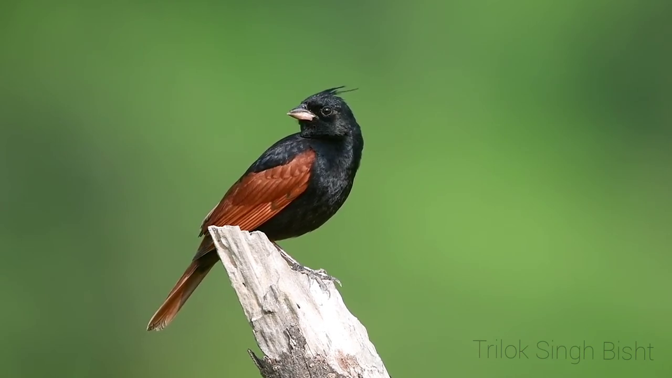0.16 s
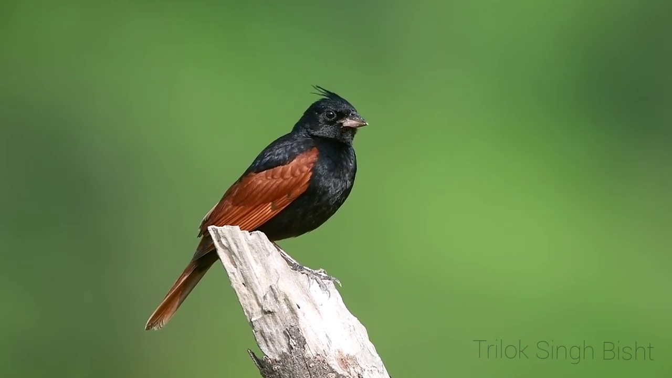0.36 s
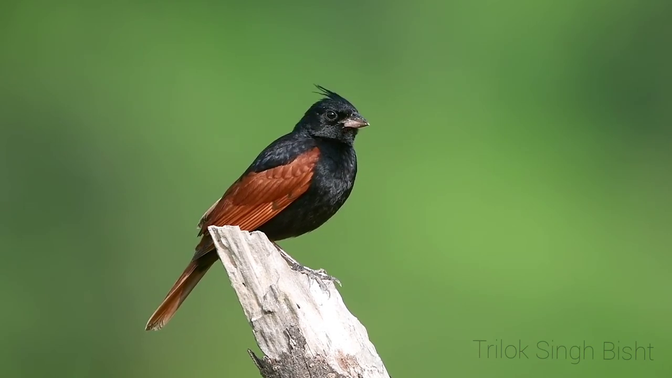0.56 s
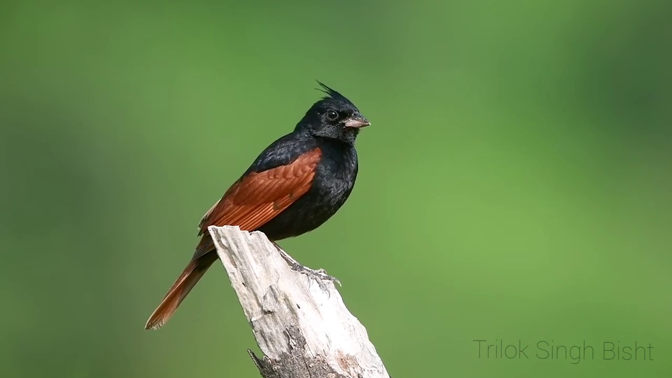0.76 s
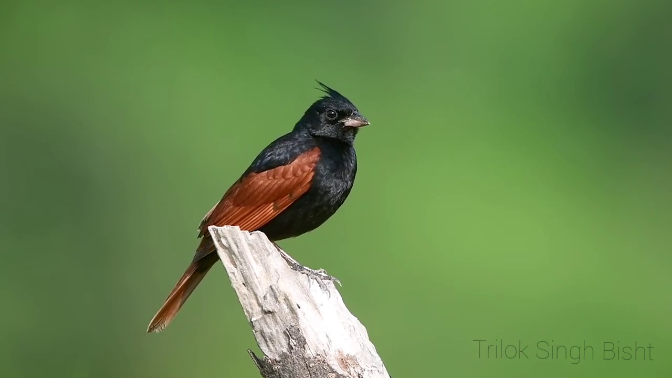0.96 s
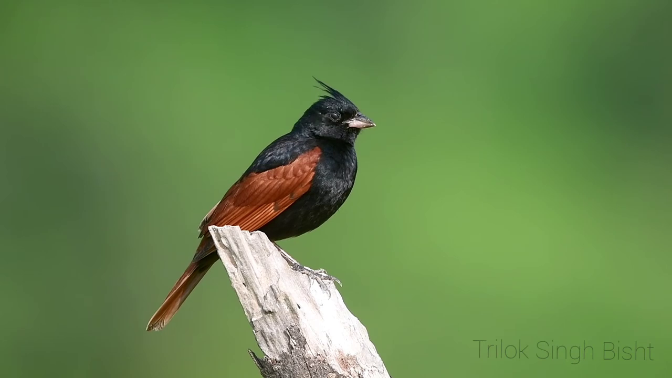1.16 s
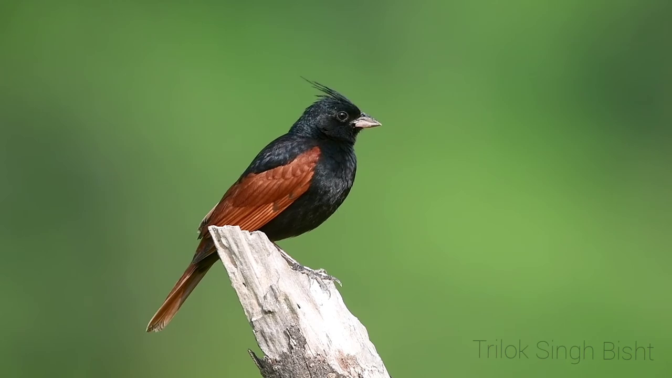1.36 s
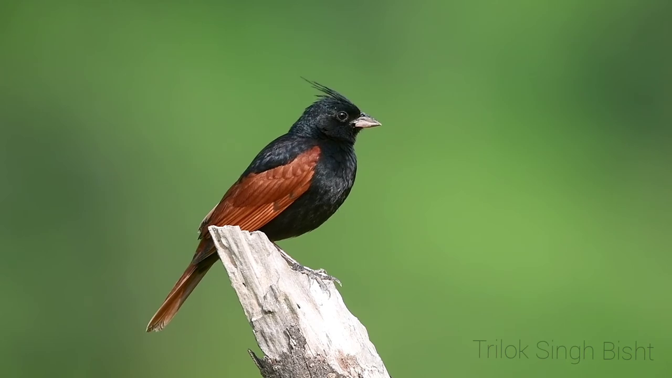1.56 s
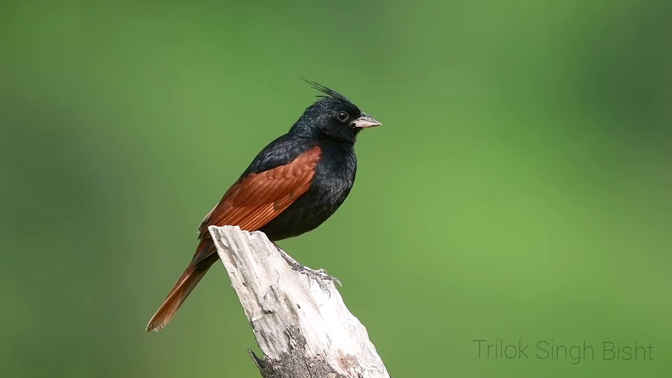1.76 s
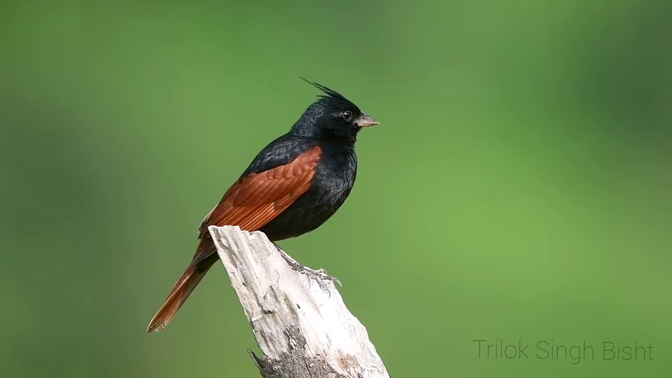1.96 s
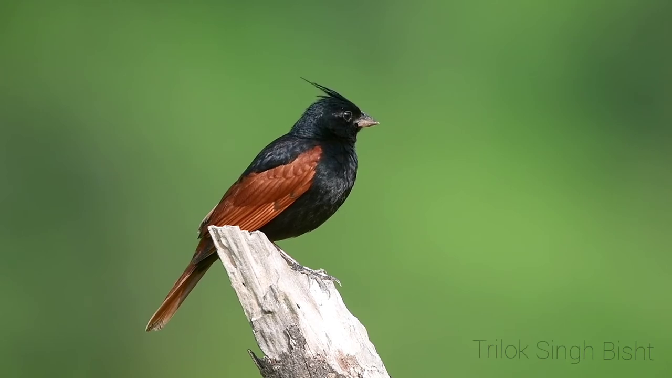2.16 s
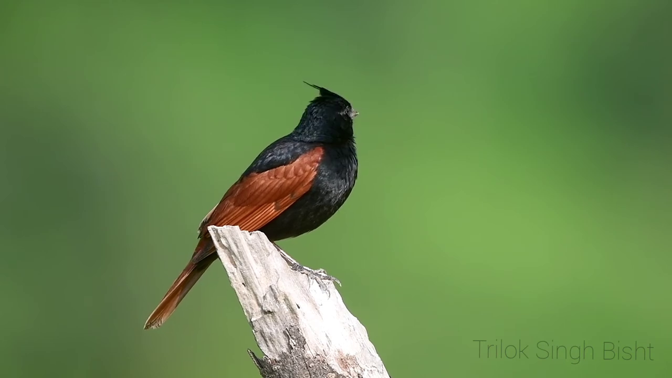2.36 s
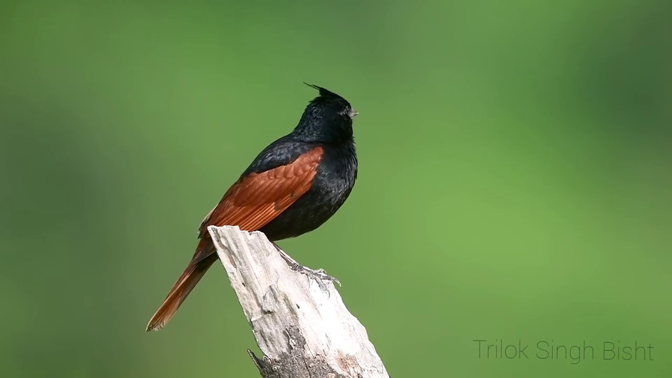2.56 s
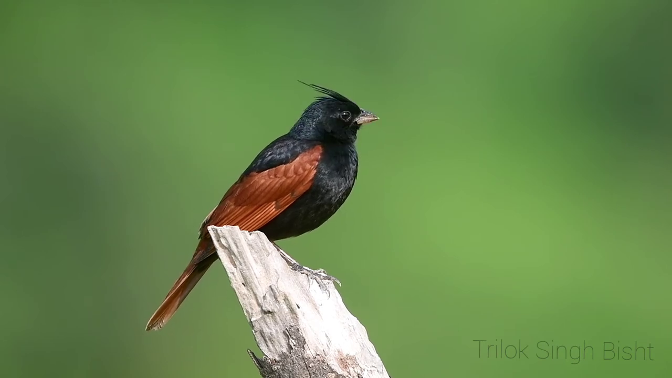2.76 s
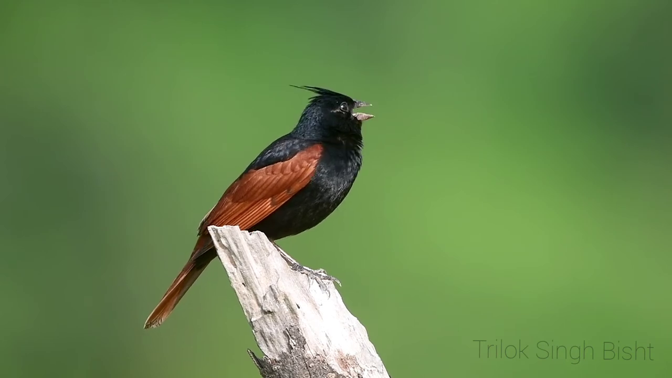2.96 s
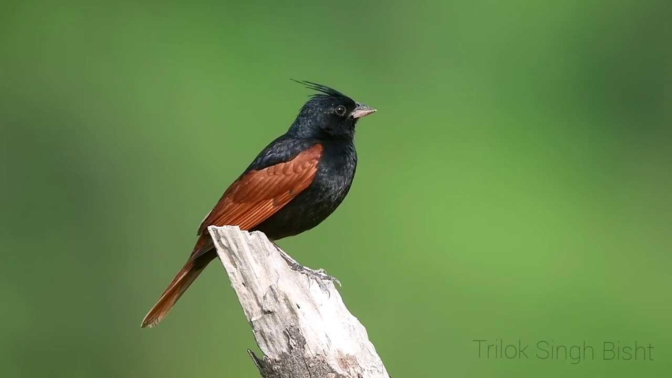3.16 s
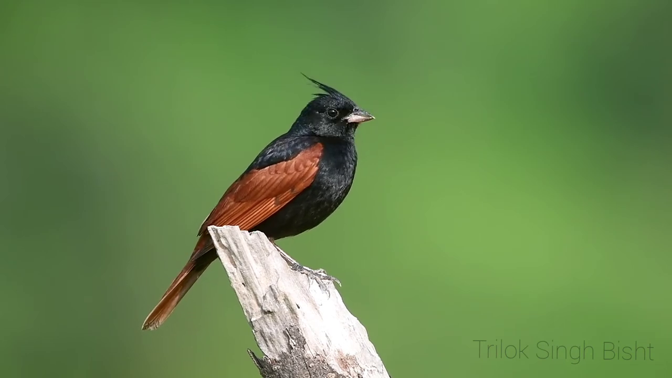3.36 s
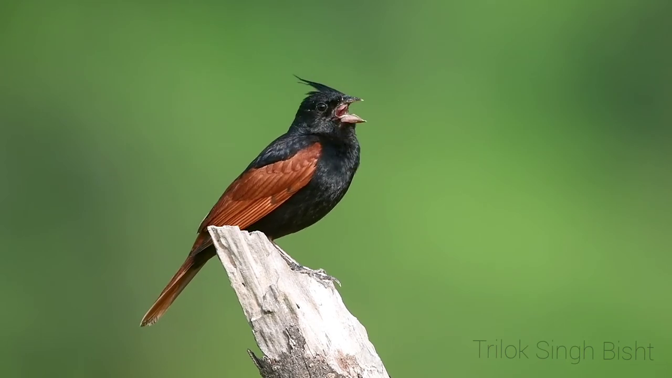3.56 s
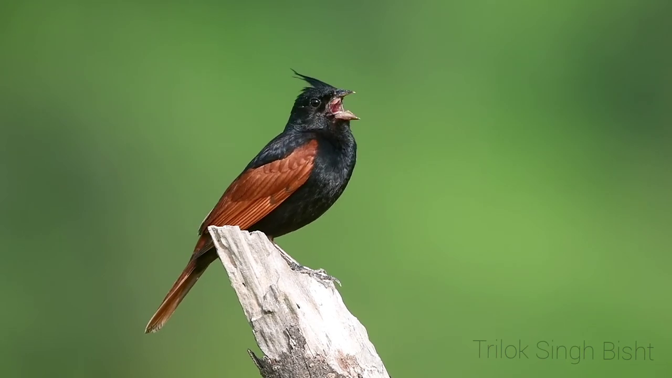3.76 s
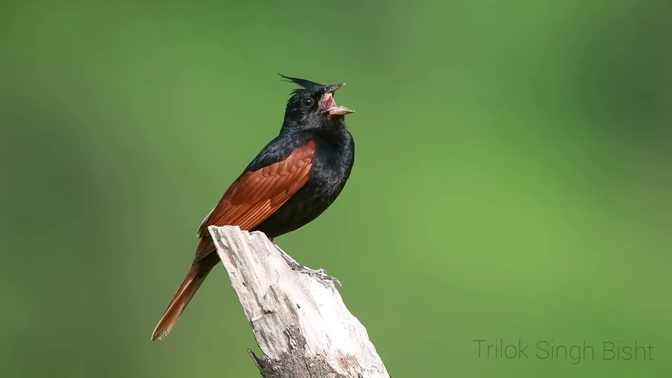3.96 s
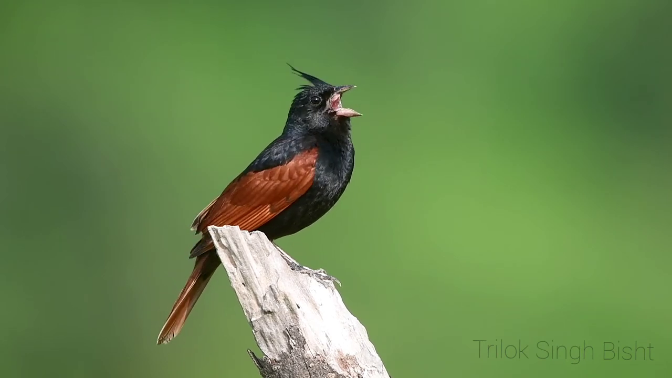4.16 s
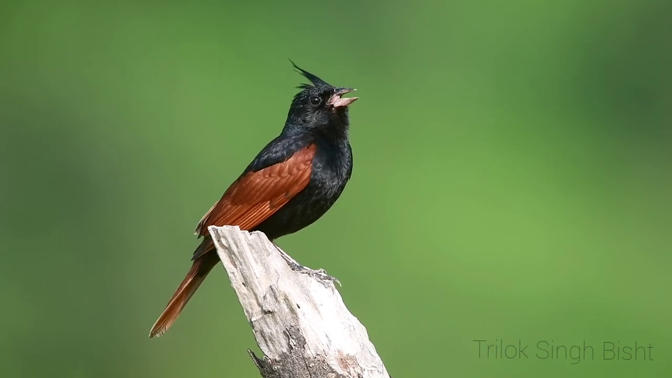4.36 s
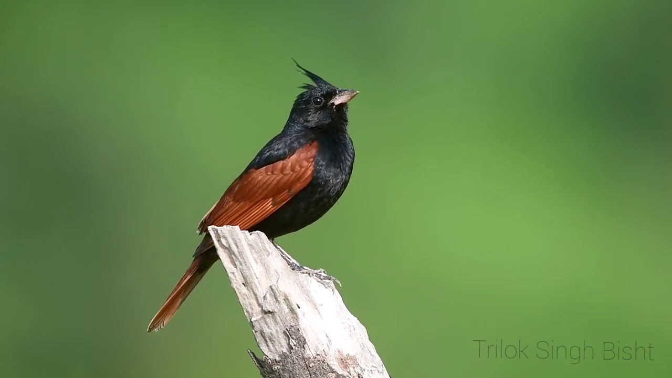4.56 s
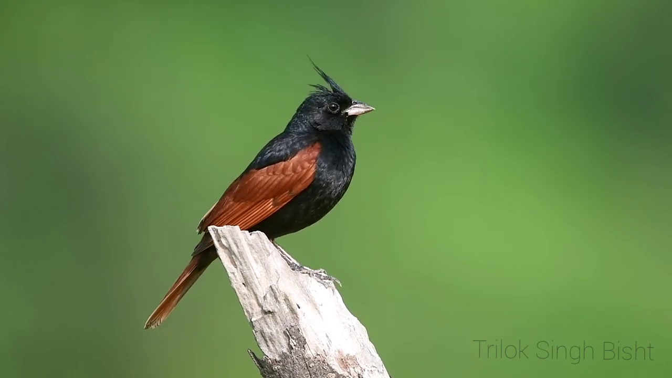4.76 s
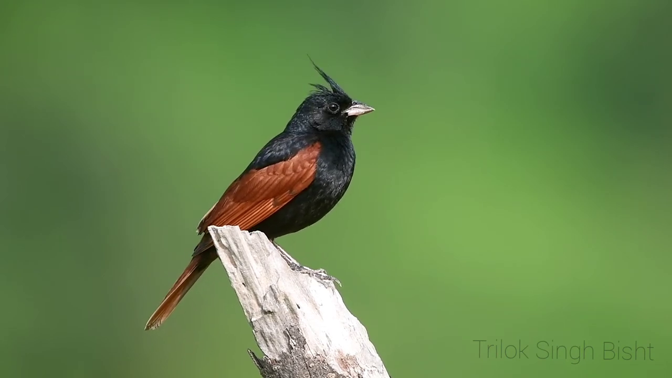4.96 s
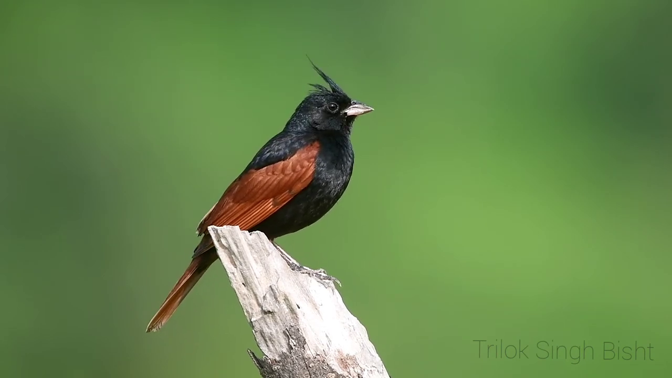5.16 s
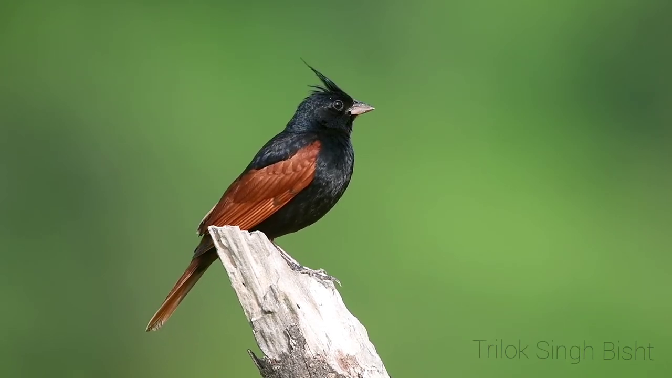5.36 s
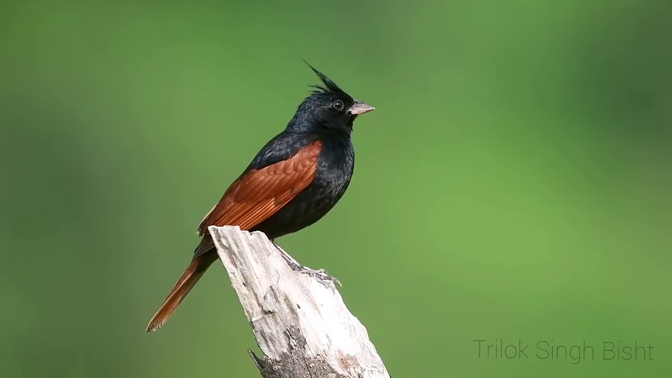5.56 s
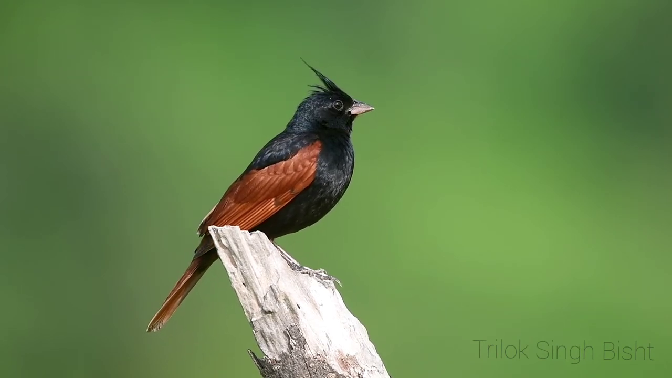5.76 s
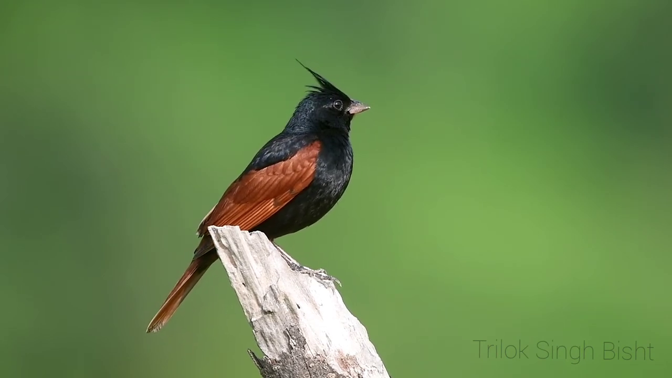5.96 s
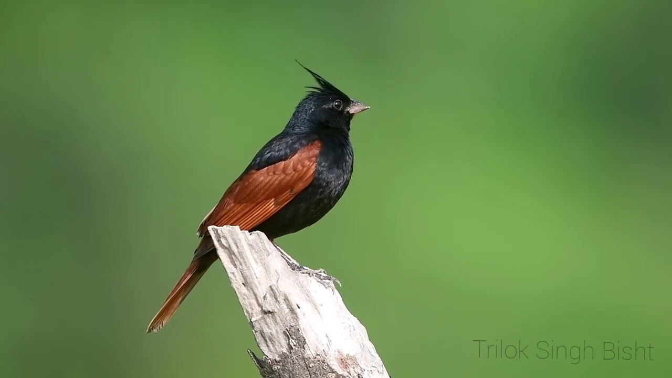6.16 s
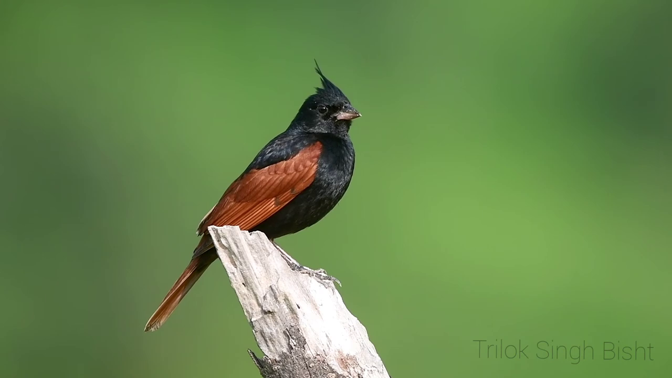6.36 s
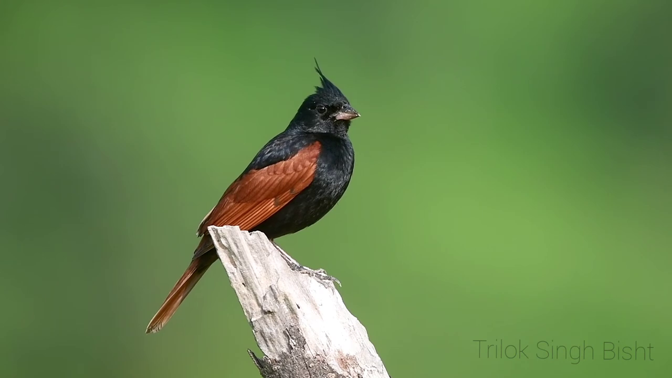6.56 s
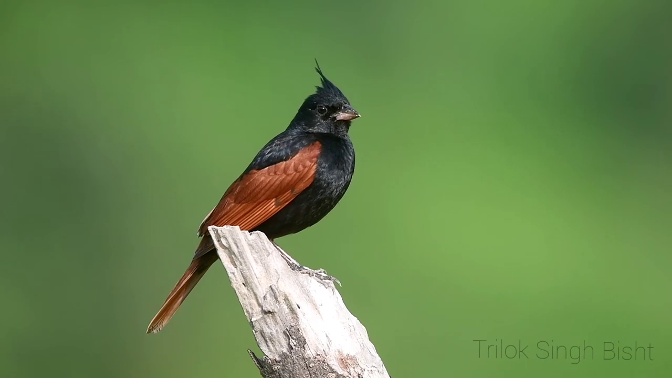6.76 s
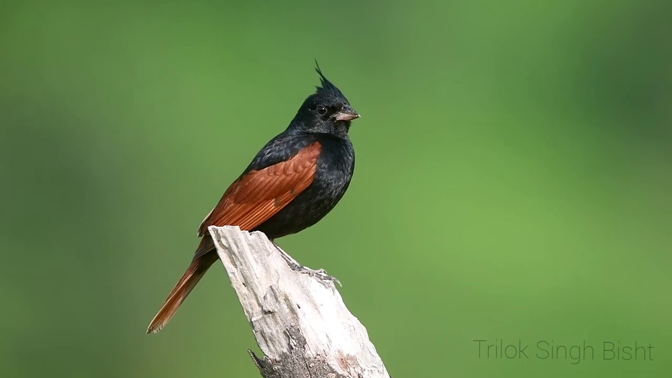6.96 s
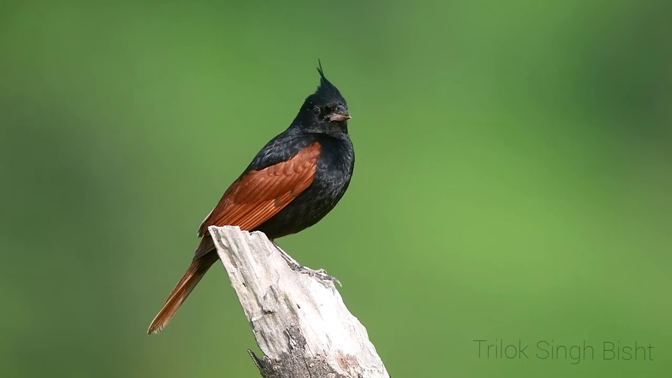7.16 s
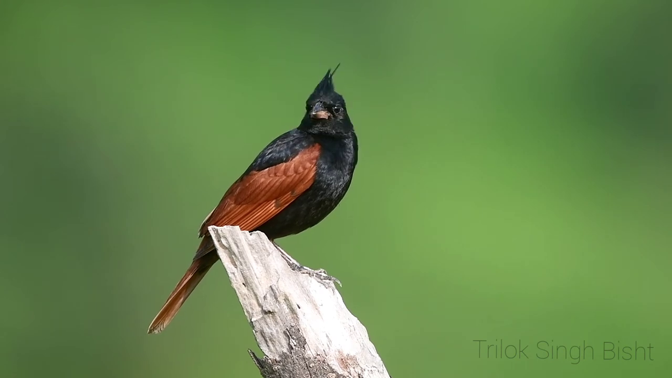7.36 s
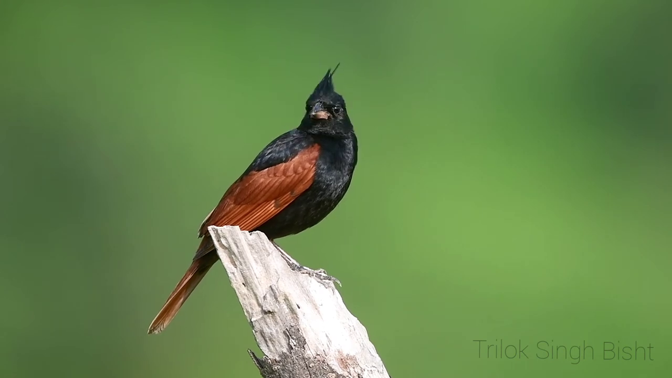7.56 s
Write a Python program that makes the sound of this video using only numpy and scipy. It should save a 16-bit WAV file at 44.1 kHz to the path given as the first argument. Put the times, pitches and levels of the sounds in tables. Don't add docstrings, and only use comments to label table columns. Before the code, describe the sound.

A small crested bird close by sings four buzzy, whistled syllables and a long falling glide, over faint distant chips, wails and insect shimmer.

```python
import sys
import numpy as np
from scipy import signal
from scipy.fft import rfft, irfft, next_fast_len
from scipy.io import wavfile
from scipy.ndimage import uniform_filter1d, map_coordinates

SR = 44100
rng = np.random.default_rng(int(sys.argv[2]) if len(sys.argv) > 2 else 0)


def makeup_ratio(level_db):
    decades = np.asarray(level_db, float) / 20
    return 10 ** decades


def output_pcm(signal):
    pcm = np.clip(np.atleast_2d(signal).T, -1, 1) * 32767
    wavfile.write(sys.argv[1], SR, np.round(pcm).astype(np.int16))


N = 336042

BUZZ_DEPTH_HZ = 370
BUZZ_FADE_S = .003


def unit(x):
    return x / np.sqrt(np.mean(x ** 2) + 1e-20)


def along(points, hz, order=1):
    table = np.transpose(points)
    return np.interp(np.log(hz + 1), np.log(table[0] + 1), table[order])


def curves(rows):
    s, *cols = np.transpose(rows)
    return [np.interp(np.arange(N) / SR, s, c) for c in cols]


def note(rows):
    s, *cols = np.transpose(rows)
    t = np.arange(max(s[0], 0), s[-1], 1 / SR)
    return round(t[0] * SR), t, [np.interp(t, s, c) for c in cols]


def add(mix, start, x, pan_db=0, lag=0):
    for side, (late, sign) in enumerate(((max(lag, 0), 1), (max(-lag, 0), -1))):
        part = mix[side, start + late:][:len(x)]
        part += makeup_ratio(sign * pan_db / 2) * x[:len(part)]


def phase(hz):
    return 2 * np.pi * np.cumsum(hz) / SR


def wobble(rate, size=N):
    knots = rng.standard_normal(int(N * rate / SR) + 4)
    return map_coordinates(knots, [np.arange(size) * rate / SR], order=2)


def filtered(x, response):
    m = next_fast_len(N + 8192)
    return irfft(rfft(x, m) * response(np.fft.rfftfreq(m, 1 / SR)), m)[..., :N]


def syllable(s, db, whistle_s, buzz_s, swell_db):
    start, fall_s = s - whistle_s, .061 + .0004 * db
    end_db = -22.5 + 400 * buzz_s
    buzz = []
    for before, level in ((buzz_s, -24.5), (buzz_s / 2, end_db - 5), (BUZZ_FADE_S, end_db)):
        buzz.append((start - before, 6108 + 12000 * before, level, BUZZ_DEPTH_HZ))
    whistle_hz, sink_hz_per_s = 6054, 36000
    turn_s = .021 - .56 * whistle_s
    low_hz = whistle_hz - sink_hz_per_s * (whistle_s - turn_s)
    whistle = [(start, whistle_hz, -0.5, 0), (s - turn_s, low_hz, swell_db, 0)]
    flick = [(s - .4 * turn_s, 5780, -5 + swell_db / 2, 0), (s, 6250, -28, 0)]
    # share of its length, pitch in Hz, level in dB.
    fall_shape = [(.04, 6650, -16.5), (.125, 5790, -0.5), (.29, 5078, 0), (.82, 3838, -1),
                  (.9, 3500, -10.5), (1, 3164, -19.5)]
    fall = [(s + share * fall_s, hz, level, 0) for share, hz, level in fall_shape]
    return np.add(buzz + whistle + flick + fall, [0, 0, db, 0])


def syrinx(rows, buzz_hz=168, dip=.76):
    # time in seconds, length in seconds, depth 0-1.
    catches = [(2.955, .005, 0.4), (2.970, .003, 1), (2.977, .004, .85), (2.997, .007, 0.4),
               (3.556, .004, 0.95), (3.568, .004, 0.5), (3.597, .005, 0.8), (3.779, .004, 0.2),
               (3.813, .003, 0.5), (3.988, .005, 0.17), (4.017, .004, 0.4), (4.17, .005, 0.85),
               (4.185, .01, 0)]
    # time in seconds, length in seconds, gain in dB.
    surges = [(2.959, 0.012, 4), (2.984, 0.0094, 9.5), (3.559, 0.016, 4.5), (3.584, 0.0053, 4),
              (3.79, .008, 3.5), (3.847, 0.017, 2), (4.257, 0.044, 0)]
    start, t, (hz, db, depth_hz) = note(rows)
    share = depth_hz / BUZZ_DEPTH_HZ
    stop = 0
    if depth_hz.any():
        stop = t[np.flatnonzero(depth_hz > 1)[-1]]
    else:
        hz = uniform_filter1d(hz, size=700, mode="nearest")
    swing = 2 * np.pi * buzz_hz * (t - stop + BUZZ_FADE_S) + 0.67 * wobble(120, len(t))
    shake = np.cos(swing)
    sung_hz = hz + depth_hz * shake
    turn = phase(sung_hz + 8 * wobble(250, len(t)))
    lean = np.clip(-0.44 + 17 * (stop - t), -.8, .8) * np.clip(share, 0, 1)
    level = makeup_ratio(db + 0.52 * wobble(330, len(t)))
    level = level * (1 - dip * np.clip(share, 0, 1) * ((1 + shake) / 2) ** 2)
    level = level * (1 + lean * np.sin(swing))
    level = level * np.clip(np.minimum(t - t[0], t[-1] - t) / .002, 0, 1)
    for s, length, depth in catches:
        level = level * (1 - np.clip(depth, 0, 1) * np.exp(-(2 * (t - s) / length) ** 2))
    for s, length, gain_db in surges:
        level = level * makeup_ratio(gain_db * np.exp(-(2 * (t - s) / length) ** 2))
    return start, sung_hz, turn, level, share


def bunting():
    # break in seconds, level in dB, whistle and buzz lengths in seconds, swell in dB.
    syllables = [
        (2.979, -17, 0.022, 0.037, 1.5),
        (3.576, -4.5, 0.021, 0.036, -2.5),
        (3.797, 0, .027, 0.048, -1.5),
        (4.0046, 0, 0.03, 0.059, -2.5),
    ]
    # time in seconds, pitch in Hz, level in dB.
    glide = [(4.12, 5670, -47.5), (4.14, 5390, -18.5), (4.164, 5203, -10), (4.21, 4840, -12.5),
             (4.25, 4526, -12), (4.29, 4240, -16), (4.349, 3937, -21.5), (4.355, 3680, -50)]
    # multiple of the pitch, level in dB.
    overtones = [(2, -45), (3, -46)]
    # Hz, left in dB, right in dB, left lead in radians.
    path = [(3500, -14, -12, 0.49), (4050, -12, -9, .45), (4500, -9.5, -9, 0.39), (4650, -7.5, -13, -0.43),
            (5260, -10, -5.5, .05), (5770, -12, -6, -0.37), (6300, -9, -3, 1.8), (6600, -4.5, -10.5, 0.35)]
    # Hz, level in dB.
    beak = [(7500, -10), (8500, -5), (9500, -8), (11000, -2.5), (13500, -4.5), (15500, -10)]
    # delay in seconds, left then right.
    echo_s = [
        [9 / 4640],
        [14.5 / 4640],
    ]
    echo_db = [[-10], [-4.5]]

    def near_surface(hz):
        band = np.exp(-((hz - 4800) / 400) ** 2 - 2j * np.pi * hz * np.array(echo_s))
        return 1 + makeup_ratio(echo_db) * band

    closing = np.pad(np.add(glide, [0, 0, 12]), ((0, 0), (0, 1)))
    tone, over = np.zeros((2, 2, N))
    for rows in [syllable(*row) for row in syllables] + [closing]:
        start, sung_hz, turn, level, share = syrinx(rows)
        size = len(turn)
        ports = [along(path, sung_hz, order=k) for k in (1, 2, 3)]
        left_db, right_db, lead = uniform_filter1d(ports, size=45, mode="nearest")
        pair = np.sin([turn + lead / 2, turn - lead / 2])
        tone[:, start:start + size] += level * makeup_ratio([left_db, right_db]) * pair
        for k, k_db in overtones:
            edge_db = k_db + 6 * share + 2.6 * wobble(200, size)
            add(over, start, makeup_ratio(edge_db - 10.5) * level * np.sin(k * turn), pan_db=9.0)
    tone = filtered(tone, near_surface)
    over = filtered(over, lambda hz: makeup_ratio(along(beak, hz)))
    scatter = makeup_ratio(2.0) * twigs(over, t60=.05) + makeup_ratio(-14.0) * twigs(tone, t60=0.063)
    return tone + over + scatter + makeup_ratio(-31.5) * hillside(tone)


def whistlers():
    # seconds from the top, pitch in Hz, level in dB.
    swoop = [(-.07, 1447, -20), (-.025, 1676, -8), (-.01, 2250, -1.5), (0, 2480, -10.5), (.11, 2206, 0.5),
             (.21, 1983, -6), (.25, 1914, -19)]
    # time in seconds, level in dB, pitch ratio.
    swoop_calls = [
        (1.96, -55, 0.99),
        (2.452, -55.5, 1.02),
    ]
    # seconds from the start, pitch in Hz, level in dB.
    pipe = [(0, 1747, -13), (.022, 2015, -2.5), (.062, 2013, -0.5), (.081, 2480, -10), (.104, 2330, -12),
            (.111, 2310, -21)]
    # time in seconds, level in dB, pitch ratio.
    pipe_calls = [
        (5.688, -45.5, 0.98),
        (5.853, -42, 0.97),
        (6.032, -42, 0.99),
    ]
    # time in seconds, pitch in Hz, level in dB.
    flourish = [(7.255, 1987, -57), (7.270, 2005, -42.5), (7.283, 2060, -58), (7.292, 1616, -62),
                (7.322, 1780, -45), (7.335, 2250, -55), (7.365, 2110, -59), (7.390, 2013, -49),
                (7.410, 1914, -64)]
    # time in seconds, pitch in Hz, level in dB.
    churr = [
        [(7.062, 1700, -63), (7.078, 1745, -52), (7.105, 1740, -49), (7.125, 1606, -54), (7.145, 1730, -53.5),
         (7.19, 1710, -50), (7.21, 1680, -66)],
        [(7.065, 2020, -58), (7.098, 1970, -51), (7.118, 1846, -54), (7.14, 2020, -55), (7.178, 2050, -49.5),
         (7.205, 2030, -55)],
        [(7.128, 2200, -52), (7.142, 2280, -54), (7.18, 2220, -55), (7.205, 2200, -63)],
    ]
    # time and length in seconds, first and last Hz, peak in dB.
    slurs = [(0, 0.037, 1366, 1275, -52.5), (.03, 0.058, 1214, 1150, -59.5), (0.01, 0.03, 3700, 2900, -61),
             (0.424, .025, 2340, 2170, -70), (.48, .1, 1490, 1500, -66.5), (1.417, .04, 3850, 4200, -58),
             (2.602, .075, 2000, 1770, -67), (5.11, .05, 2200, 2287, -57.5), (5.296, .04, 1840, 1848, -68),
             (5.12, .11, 3940, 4234, -58), (7.03, .03, 3780, 4050, -67.5),
             (0.019, 0.043, 2160, 2050, -57.5), (0.098, 0.052, 2100, 1840, -62.5),
             (0.343, 0.054, 3920, 3000, -63), (0.582, 0.036, 5000, 4330, -53),
             (1.279, 0.11, 4660, 4240, -55), (3.352, 0.073, 1270, 1090, -62), (3.43, 0.14, 834, 841, -62.5),
             (3.528, 0.12, 850, 1090, -67), (5.022, 0.11, 4050, 3930, -64),
             (5.026, 0.094, 5200, 4500, -63.5), (5.238, .04, 6550, 6530, -53),
             (6.017, 0.025, 6560, 6600, -62), (6.905, 0.045, 4480, 4240, -67),
             (7.277, 0.052, 2900, 3500, -58.5), (7.282, 0.022, 2350, 2330, -55),
             (7.504, 0.064, 3730, 3540, -63.5)]
    # left-right in dB, samples left lags, gain in dB.
    seats = [(-11, 10, 3), (-3, 1, 0), (7, -10, 7), (7, -10, 7), (-3, 2, 0)]

    def calls(shape, events):
        return [np.multiply(shape, [1, ratio, 1]) + [s, 0, db] for s, db, ratio in events]

    tweets, peak = [], 0.37
    for s, length, first_hz, last_hz, db in slurs:
        top = (s + peak * length, first_hz + peak * (last_hz - first_hz), db)
        tweets.append([(s, first_hz, db - 3), top, (s + length, last_hz, db - 6)])
    birds = [(calls(swoop, swoop_calls), .4, 0), (calls(pipe, pipe_calls), .4, .2),
             ([flourish], .4, 0), (churr, .9, 0), (tweets, .9, 0)]
    mix = np.zeros((2, N))
    for (notes, far, burr), (pan_db, lag, gain_db) in zip(birds, seats):
        for rows in notes:
            start, t, (hz, db) = note(rows)
            smooth_hz = uniform_filter1d(hz, 200, mode="nearest")
            level = makeup_ratio(db + gain_db + far * 3.5 * wobble(90, len(t)))
            level = level * (1 + burr * np.sin(2 * np.pi * 290 * t))
            tone = np.sin(phase(smooth_hz * (1 + far * .012 * wobble(70, len(t)))))
            add(mix, start, level * tone, pan_db, lag)
    return mix


def chipper():
    # time in seconds, peak in dB.
    chips = [(0.149, -48.5), (0.2394, -53), (1.252, -43.5), (5.269, -51), (5.368, -45), (5.455, -57),
             (6.175, -53), (1.1416, -42.5), (1.236, -45), (1.3396, -42.5), (1.538, -45), (1.632, -44.5),
             (1.882, -44.5), (1.959, -45.5), (3.1536, -43.5), (3.241, -40.5), (3.328, -38), (3.4167, -43),
             (4.8314, -46.5), (4.928, -44), (5.211, -47), (5.3, -43), (5.349, -45.5), (5.437, -41.5),
             (5.5297, -43.5), (5.6104, -47), (5.695, -47.5), (6.2754, -49), (6.496, -45.5), (6.591, -46.5),
             (7.1174, -43), (7.21, -47), (7.454, -43), (7.553, -42)]
    second_s, second_db = .042, -14
    t, mix = np.arange(0, .036, 1 / SR), np.zeros((2, N))
    along_chip = t / t[-1]
    for s, db in list(chips) + [(s + second_s, db + second_db) for s, db in chips]:
        hz = 5760 * rng.normal(1, .006) * (1 - .15 * along_chip ** 1.9)
        hz = hz + 45 * wobble(300, len(t))
        level = makeup_ratio(db - 8.5 + 2.8 * wobble(150, len(t))) * np.sin(np.pi * along_chip ** 0.64)
        add(mix, round((s - .005) * SR), level * np.sin(phase(hz)), pan_db=-12.5)
    return makeup_ratio(-2.0) * (mix + makeup_ratio(-4) * twigs(mix, t60=0.11))


def wail(mix):
    # time in seconds, pitch in Hz, level in dB, brightness in dB per octave.
    wails = [
        [(1.95, 584.4, -79, 3), (2.0, 728, -68.5, 1.5), (2.09, 859, -67, 5), (2.17, 1008, -67, -1),
         (2.33, 1029, -77, 9), (2.365, 1010, -61.5, -15), (2.535, 1008, -63, -14), (2.58, 1008, -70, 3),
         (2.73, 995, -79.5, 5.5)],
        [(4.76, 503, -67, -5), (4.85, 575, -63, -13), (4.89, 650, -54.5, -2.5), (4.96, 833, -67, -1),
         (4.99, 868, -64, 0), (5.01, 976, -68, -6), (5.17, 1037, -66.5, 2.5), (5.51, 1015, -61.5, -8),
         (5.545, 990, -64, -1)],
    ]
    # time in seconds, undertone level in dB.
    splits = [
        (2.539, -4.5),
        (5.07, -6),
    ]
    # thirds of the pitch, level in dB.
    orders = [(3, 3), (4, 10), (5, 5), (6, 4.5), (7, 4), (9, -9), (12, -10)]
    # Hz, level in dB.
    wail_throat = [(600, -22), (850, -9), (1020, -1), (1300, 3), (1700, -3), (2080, 3), (2400, -1),
                   (3300, -6), (3700, -30)]
    for rows, (split_s, split_db) in zip(wails, splits):
        start, t, (hz, db, bright_db) = note(rows)
        under_db = np.interp(t - split_s, [-.03, .03], [-30, split_db])
        beads = .55 * np.sin(phase(40 + 7 * wobble(18.0, len(t))))
        under_db = under_db + 20 * np.log10(1 + beads)
        crack_hz = 3 + .004 * SR * np.abs(np.gradient(hz))
        turn = phase(hz + crack_hz * wobble(46.0, len(t))) / 3
        for k, k_db in orders:
            level_db = db + k_db + bright_db * np.log2(k / 3) + along(wail_throat, k * hz / 3)
            level_db = level_db + under_db * (k % 3 > 0) + 2.4 * wobble(50, len(t))
            add(mix, start, makeup_ratio(level_db) * np.sin(k * turn))


def croak(mix):
    # time in seconds, pitch in Hz, level in dB, rasp 0-1.
    croaks = [
        [(2.73, 760, -69, 0.75), (2.80, 648, -48.5, 0.7), (2.85, 583, -55, 0.6), (2.89, 535, -88, 1)],
        [(5.545, 726, -58, 0.9), (5.74, 695, -53, 1), (5.83, 649, -54, 0.75), (5.93, 630, -43.5, 0),
         (5.985, 583, -52, 0.36), (6.02, 600, -69, 0.9), (6.2, 574, -71, 0.98)],
    ]
    # rasp factor, upper band in dB.
    croak_throats = [
        (1.5, -9),
        (.8, 0),
    ]
    for rows, (hoarse, band_db) in zip(croaks, croak_throats):
        start, t, (hz, db, rasp) = note(rows)
        rough = np.clip(rasp, 0, 1)
        upper_db = np.minimum(-58 - db, 0)
        scatter_hz = hoarse * 22 * rough * wobble(261.2, len(t))
        turn = phase(hz + 8 * wobble(58.8, len(t)) + scatter_hz)
        beat = 1 + .75 * rough * np.sin(phase(42 + 10 * wobble(20, len(t))))
        beat = beat * makeup_ratio((.8 + 2 * rasp) * wobble(150, len(t)))
        bands = np.sin(2 * turn) + makeup_ratio(upper_db + band_db) * np.sin(3.12 * turn)
        add(mix, start, makeup_ratio(db) * beat * bands)


def fowl():
    mix = np.zeros((2, N))
    wail(mix)
    croak(mix)
    return np.array([np.roll(mix[0], 6), makeup_ratio(4.5) * mix[1]])


def rattler():
    # time and length in seconds, low and high Hz, level in dB.
    rattles = [
        (2.930, .064, 2220, 3120, -30.5),
        (2.990, .068, 2830, 2990, -43),
        (2.990, .045, 2150, 2400, -47),
    ]
    # left-right in dB, steady part under the pulses, pulses a second, swell in dB a second.
    rattle_seats = [
        (-11, .14, 225, -110),
        (-11, .4, 215, 40),
        (-11, .2, 215, -60),
    ]
    mix = np.zeros((2, N))
    for (s, length, low_hz, high_hz, db), (pan_db, steady, rate, swell_db) in zip(rattles, rattle_seats):
        t = np.arange(0, length, 1 / SR)
        shape = np.clip(np.minimum(t / .007, (length - t) / (.3 * length)), 0, 1) * makeup_ratio(swell_db * t)
        for hz, lag, gain in ((low_hz, 0, 1), (high_hz, 1.1, 0.77)):
            pulse = steady + np.sin(phase(rate + 10 * wobble(90, len(t))) / 2 + lag) ** 4
            pulse = pulse * makeup_ratio(1.9 * wobble(156, len(t)))
            band = np.sin(phase(hz + 75 * wobble(250, len(t))))
            add(mix, round(s * SR), makeup_ratio(db) * shape * gain * pulse * band, pan_db, lag=9)
    return mix


def mutterer():
    # time and length in seconds, centre in Hz, scatter in Hz, level in dB.
    mutters = [(.17, .08, 3250, 200, -61), (.74, .06, 3800, 110, -64), (.88, .04, 3100, 120, -64),
               (1.19, .06, 3550, 300, -61), (2.8, .04, 1830, 60, -63), (2.81, .06, 2350, 130, -62),
               (4.63, .17, 3050, 130, -60), (5.43, .13, 3350, 300, -59), (7.06, .15, 3350, 250, -61)]
    mix = np.zeros((2, N))
    for s, length, hz, scatter_hz, db in mutters:
        t = np.arange(0, length, 1 / SR)
        level = makeup_ratio(db + 1.7 * wobble(210, len(t))) * np.abs(np.sin(np.pi * t / length)) ** .5
        voice = np.sin(phase(hz + scatter_hz * wobble(440, len(t))))
        add(mix, round(s * SR), level * voice, pan_db=-4.5)
    return mix


def scolder():
    # time in seconds, length in seconds, level in dB.
    scolds = [(4.615, 0.21, -50.5), (4.821, 0.15, -59), (5.099, 0.16, -51), (5.253, 0.11, -53.5),
              (5.423, 0.16, -57.5), (5.733, 0.15, -51), (5.942, 0.093, -49.5), (6.013, 0.14, -52.5),
              (7.044, 0.33, -61.5)]
    # centre in Hz, width in Hz, level in dB.
    scold_throat = [(3000, 220, -10), (4050, 200, -2), (5020, 260, 1), (5750, 220, -6), (6350, 300, -13),
                    (4500, 2500, -8)]

    def throat(hz):
        bands = sum(makeup_ratio(db) / (1 + (2 * (hz - c) / w) ** 2) for c, w, db in scold_throat)
        return (hz > 2700) * (hz < 7200) * bands

    gate, now = np.zeros(N), np.arange(N) / SR
    for s, length, db in scolds:
        gate += makeup_ratio(db) * np.clip(np.minimum((now - s) / 0.023, (s + length - now) / 0.022), 0, 1)
    return gate * unit(filtered(rng.standard_normal((2, N)), throat))


def ticks():
    # time in seconds, peak in dB.
    tick_times = [(3.785, -48.5), (4.178, -46.5), (4.395, -52.5), (4.546, -53.5), (7.066, -56)]
    mix, t = np.zeros((2, N)), np.arange(100) / SR
    for s, db in tick_times:
        add(mix, round(s * SR), makeup_ratio(db - 60 * t / .002) * rng.standard_normal(len(t)))
    return filtered(mix, lambda hz: hz / (hz + 900))


def cricket(rate=85):
    # time in seconds, level in dB, pitch in Hz.
    trill = [(0, -64.5, 7150), (.95, -61, 7150), (1.08, -58, 7030), (1.11, -89.5, 7000), (4.3, -82, 7110),
             (7.0, -68, 7110), (7.08, -63.5, 7110), (7.62, -68, 7110)]
    level_db, hz = curves(trill)
    strokes = .5 + np.sin(phase(rate + 3 * wobble(4)) / 2) ** 2
    turn = phase(hz + 30 * wobble(100))
    return makeup_ratio(level_db + wobble(14)) * unit(strokes * np.sin([turn, turn + 2.0]))


def rush(spectrum, patchy_db):
    # Hz, side over middle in dB.
    width = [(60, -27.5), (120, -37.5), (230, -31), (450, -14), (870, -6), (1690, 1.5), (3310, 0.5),
             (6450, 1.5)]
    # Hz, left-right in dB.
    tilt = [(60, -2.5), (150, 1), (390, -1), (990, -0.5), (2530, -1.5), (6450, -1.5)]
    z = signal.stft(rng.standard_normal((2, N)), nperseg=512)[2]
    field = uniform_filter1d(uniform_filter1d(rng.standard_normal(z.shape[1:]), 5, 0), 10, 1)
    pair = signal.istft(z * makeup_ratio(patchy_db * unit(field)), nperseg=512)[1][:, :N]
    mid, side = filtered(pair, lambda hz: makeup_ratio(along(spectrum, hz) + [0 * hz, along(width, hz)]))
    both = np.array([mid + side, mid - side])
    both = filtered(both, lambda hz: makeup_ratio(along(tilt, hz) * [[.5], [-.5]]))
    return both / np.std(both.mean(0))


def far_insects():
    # time in seconds, level in dB.
    chorus = [(0, -83), (.8, -77), (.85, -63), (1.07, -60), (1.15, -63.5), (2.9, -70.5), (4.4, -66.5),
              (6.2, -65), (6.9, -69), (7.62, -65)]
    # Hz, level in dB per Hz.
    insect_bands = [(4300, -57), (4800, -15), (5300, 0.5), (5700, -5.5), (6100, -5), (6500, -70.5)]
    level_db, = curves(chorus)
    shimmer = makeup_ratio(level_db + 0.5 + 1.5 * wobble(14)) * rush(insect_bands, patchy_db=5.0)
    now = np.arange(N) / SR
    strokes = np.sin(phase(112 + 3 * wobble(10)) / 2) ** 4 / .52
    return shimmer * np.where((now > .82) & (now < 1.07), strokes, 1)


def leaves():
    # time in seconds, strength in the leaves in dB.
    breeze = [(0, -69), (.85, -67), (1.15, -71), (2.9, -67.5), (4.4, -65), (6.9, -70.5), (7.62, -69.5)]
    # Hz, level in dB per Hz.
    leaf_bands = [(2300, -89.5), (2740, -16), (2990, -16), (3780, -12.5), (4220, -8), (4810, -7.5),
                  (5510, -2.5), (6900, -13.5), (7300, -17.5), (7600, -34.5), (8000, -88)]
    level_db, = curves(breeze)
    return makeup_ratio(level_db + 7.5) * rush(leaf_bands, patchy_db=2.0)


def valley():
    # Hz, level in dB per Hz.
    hum_bands = [(15, -47.5), (25, -22), (43, -14), (100, -4.5), (185, 0), (380, -7), (479, -1.5),
                 (539, -6), (629, -2), (1000, -10.5), (1980, -12), (2400, -16.5), (2560, -28.5),
                 (3000, -86.5)]
    # Hz, level in dB per Hz.
    hiss_bands = [(7400, -72), (8000, 1.5), (8600, 0.5), (12000, -2.5), (14500, -6.5), (15800, -20.5)]
    hum = makeup_ratio(-62) * rush(hum_bands, patchy_db=1.8)
    engine = makeup_ratio(-70 + 2.6 * wobble(11)) * np.sin(phase(484 + 9 * wobble(27)))
    hiss = makeup_ratio(-74.5) * rush(hiss_bands, patchy_db=0.5)
    return hum + engine + hiss


def twigs(x, t60):
    t = np.arange(2000) / SR
    taps = rng.standard_normal((2, len(t))) * makeup_ratio(-60 * t / t60) * (t > .001)
    return signal.fftconvolve(x, taps / np.linalg.norm(taps[0]), axes=1)[:, :N]


def hillside(x):
    # Hz, t60 in seconds.
    slope = [(2000, 1), (4500, 1), (7000, 0.7)]
    hz, t, z = signal.stft(rng.standard_normal((2, 30000)), SR, nperseg=256)
    tail = signal.istft(z * makeup_ratio(-60 * t / along(slope, hz)[:, None]), SR, nperseg=256)[1]
    return signal.fftconvolve(x, tail / np.linalg.norm(tail[0]), axes=1)[:, :N]


def scene():
    far = whistlers() + chipper() + fowl() + rattler() + mutterer() + scolder()
    air = makeup_ratio(-10) * twigs(far, t60=.06) + makeup_ratio(-20) * hillside(far)
    return bunting() + far + air + ticks() + cricket() + far_insects() + leaves() + valley()


def band_limit(x):
    return signal.sosfilt(signal.butter(12, 15720, fs=SR, output="sos"), x)


def record(dry):
    def gaps(hz):
        low_gap = 1 - .96 / (1 + ((hz - 2620) / 85) ** 4)
        high_gap = 1 - .95 / (1 + ((hz - 7750) / 330) ** 4)
        return low_gap * high_gap

    return band_limit(filtered(dry, gaps))


dry = scene()
out = record(dry)
output_pcm(out)
```